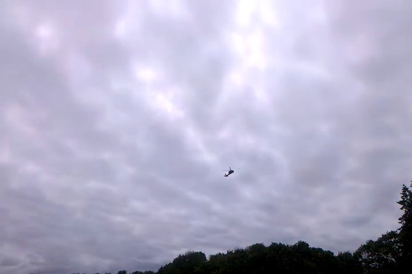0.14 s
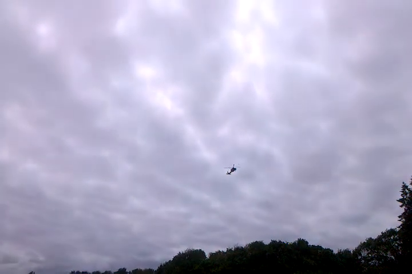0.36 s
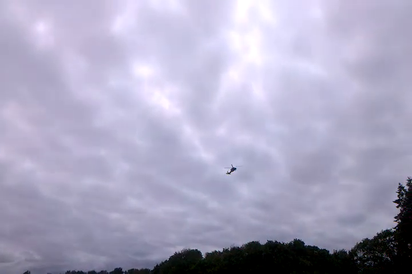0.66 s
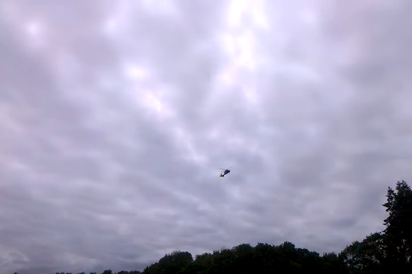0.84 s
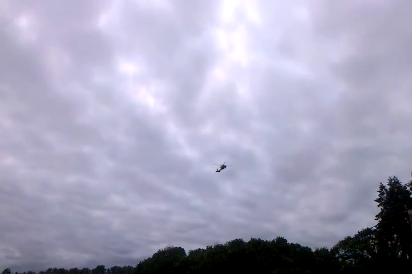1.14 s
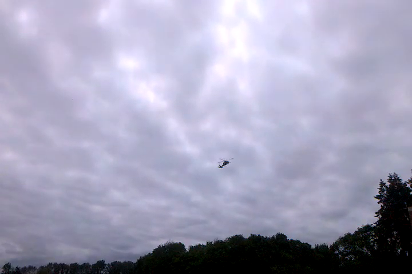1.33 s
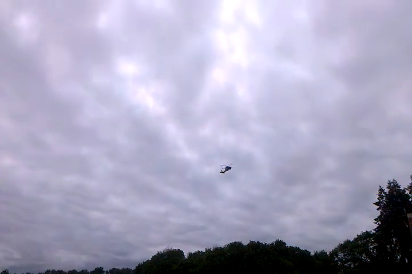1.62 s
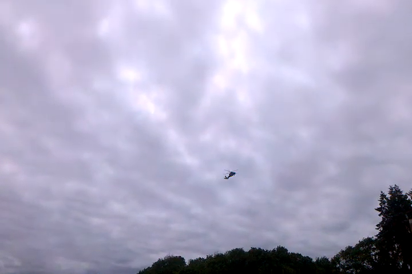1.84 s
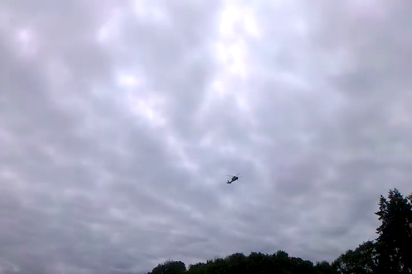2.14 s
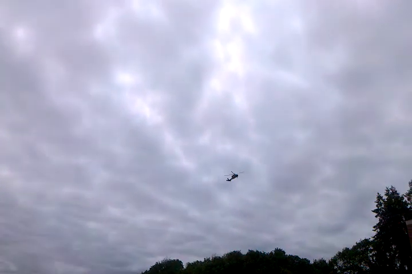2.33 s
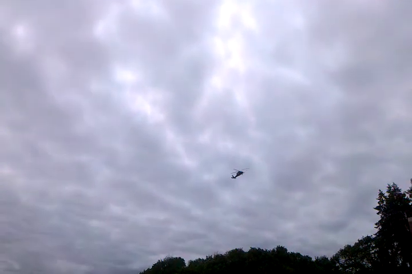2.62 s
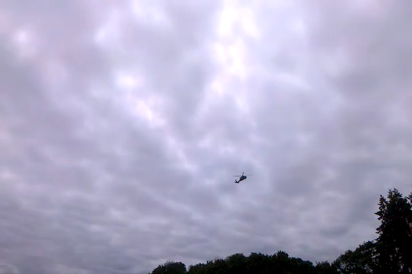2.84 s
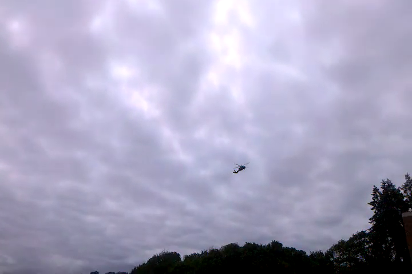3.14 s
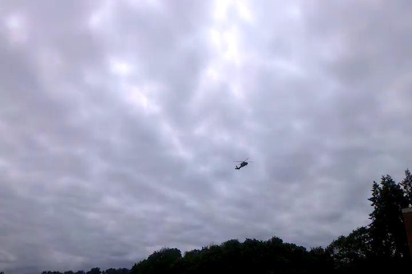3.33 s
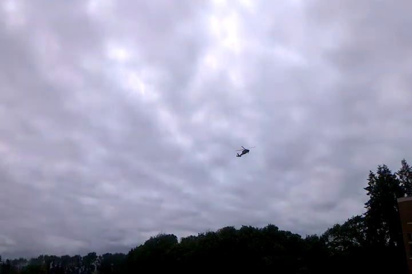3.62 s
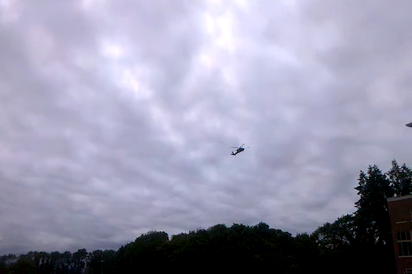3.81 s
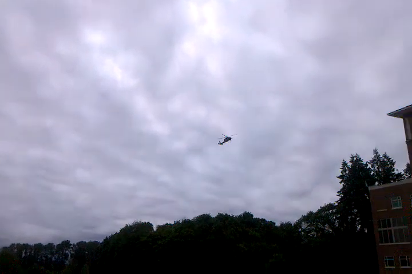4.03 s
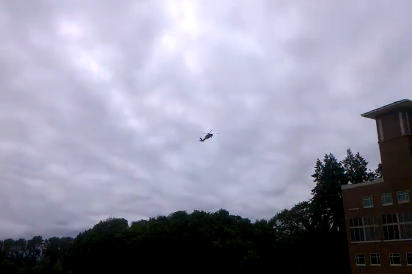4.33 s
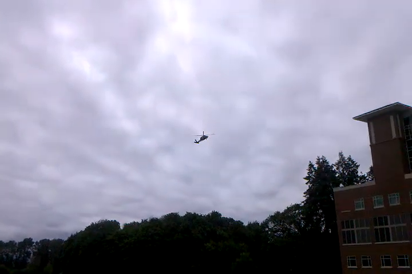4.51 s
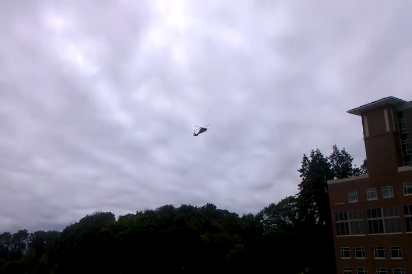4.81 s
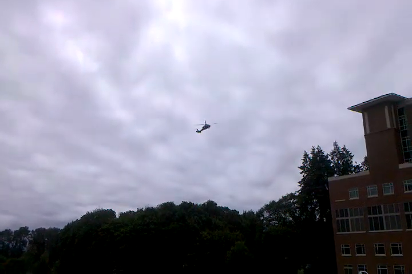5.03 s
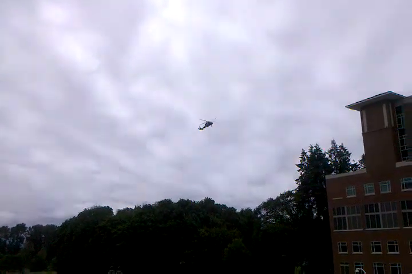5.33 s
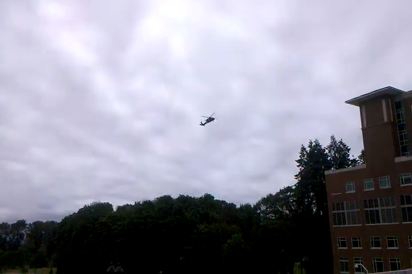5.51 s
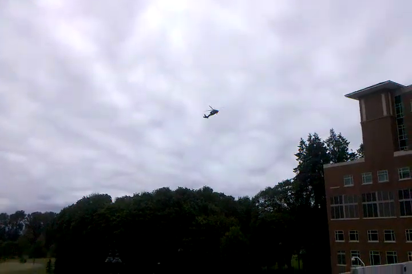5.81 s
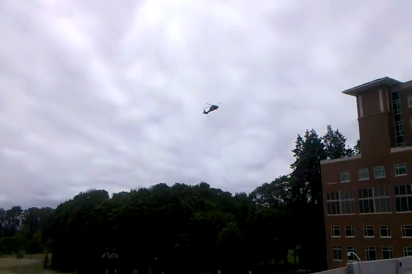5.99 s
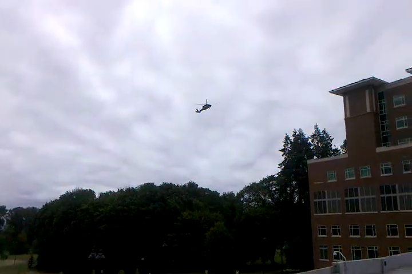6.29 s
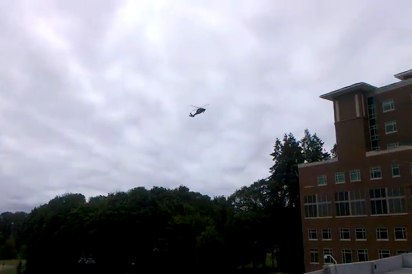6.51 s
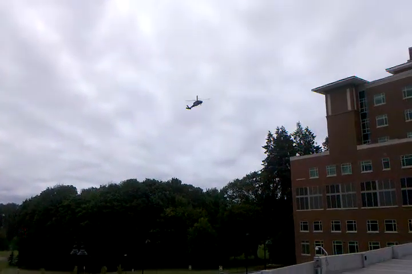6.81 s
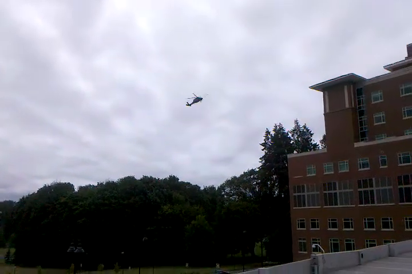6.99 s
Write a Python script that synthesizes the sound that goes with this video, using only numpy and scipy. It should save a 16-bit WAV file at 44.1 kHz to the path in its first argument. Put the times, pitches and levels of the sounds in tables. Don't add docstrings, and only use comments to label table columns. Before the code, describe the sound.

Continuous helicopter chopping outdoors, heard from a flat roof a couple of hundred metres away and closing. Deep air thuds and mid-pitched slaps flutter irregularly, some blades weak, some striking hard. The beat sharpens after three seconds, peaks with crackle and a low huff between five and six, then eases slightly while still running at the end. Rushing exhaust, steady hum, thin whine and soft wind bumps surround it, with brief building echoes and a narrow-band small microphone.

```python
import sys
import numpy as np
from scipy import signal
from scipy.fft import rfft, irfft, next_fast_len
from scipy.io import wavfile
from scipy.ndimage import uniform_filter1d, map_coordinates

SR = 44100
rng = np.random.default_rng(int(sys.argv[2]) if len(sys.argv) > 2 else 0)


def dump(signal):
    limited = np.clip(np.atleast_2d(signal).T, -1, 1)
    pcm = np.round(limited * 32767).astype(np.int16)
    wavfile.write(sys.argv[1], SR, pcm)


def elevation(decibels):
    levels = np.asarray(decibels, float)
    return 10 ** (levels / 20)


N = 315315
TIME = np.arange(N) / SR
MARGIN = SR // 10

# time in seconds,
# delay factor.
BOUNCE_PATH = [(0, 0.82), (1.8, 0.89), (2.6, 0.92), (3.3, 0.94), (6, 0.93), (7.15, 0.87)]


def unit(x):
    return x / np.sqrt(np.mean(x ** 2) + 1e-20)


def along(points, hz):
    f, v = np.transpose(points)
    return np.interp(np.log(hz + 1), np.log(f + 1), v)


def curves(rows):
    s, *cols = np.transpose(rows)
    return [np.interp(TIME, s, c) for c in cols]


def wobble(rate):
    return map_coordinates(rng.standard_normal(int(N * rate / SR) + 4), [TIME * rate])


def spells(rows, rest_db, s):
    swells = sum(elevation(db) * np.exp(-((s - at) / half) ** 2) for at, half, db in rows)
    return elevation(rest_db) + swells


def filtered(x, response):
    m = next_fast_len(N + SR // 2)
    return irfft(rfft(x, m) * response(np.fft.rfftfreq(m, 1 / SR)), m)[:N]


def resonant(x, modes):
    def response(f):
        return sum(elevation(db) * 1j * f * w / (c * c - f * f + 1j * f * w) for c, w, db in modes)
    return filtered(x, response)


def noise(spectrum, patchy_db):
    z = signal.stft(rng.standard_normal(N + 512), nperseg=512)[2]
    field = uniform_filter1d(rng.standard_normal(z.shape), size=5, axis=0)
    field = uniform_filter1d(field, size=12, axis=1)
    patched = signal.istft(z * elevation(patchy_db * unit(field)), nperseg=512)[1][:N]
    return unit(filtered(patched, lambda hz: elevation(along(spectrum, hz))))


def add(track, s, shape):
    start = round(s * SR) - len(shape) // 2 + MARGIN
    track[start:start + len(shape)] += shape


def distance():
    # time in seconds, distance in m.
    approach = [(.104, 255.9), (.978, 236.45), (1.853, 217.6), (2.733, 200.4), (3.619, 185.25),
                (4.507, 170.65), (5.392, 155.2), (6.279, 140.2), (7.01, 131.8)]
    return np.polynomial.Chebyshev.fit(*np.transpose(approach), deg=6)(TIME)


def blade_count():
    blade_hz, first_m, sound_m_s = 17.2, 250, 343
    return blade_hz * (TIME - (distance() - first_m) / sound_m_s)


def encounters():
    # time in seconds, pulse level in dB, sharp edge in dB, pulse
    # pitch in Hz, lift of slap and followers together in dB.
    vortex = [(0, -18, -43, 175, -8), (.9, -26.5, -23.5, 228, 1), (1.45, -18.5, -32, 260, -2.5),
              (2.0, -21, -32.5, 207, -3.5), (2.4, -20, -38, 198, -5), (2.75, -14, -45.5, 218, -3.5),
              (3.07, -20.5, -24, 227, -6), (3.25, -14.5, -32, 202, -1.5), (3.4, -9.5, -26, 223, -5),
              (3.9, -12, -23.5, 238, 2), (4.2, -11.5, -25, 212, -4), (4.55, -11, -25, 219, -3.5),
              (5.0, -13.5, -20, 215, 0.5), (5.25, -9, -18.5, 235, -0.5), (5.451, -9.5, -17, 234, -7.5),
              (5.92, -15.5, -25.5, 240, 2), (6.15, -20, -32, 251, -2), (7.15, -17, -24, 303, -3)]
    # time in seconds, pulse
    # and edge change in dB.
    odd_slaps = [(0.296, -19, -7), (0.405, -21, -12), (0.514, 1, -13), (0.569, -18, -8.5), (0.787, -16, -19),
                 (0.842, -9, -11), (1.005, -13, -6), (1.06, -16, -9), (1.114, -17, -6.5), (1.224, -16, -7),
                 (1.278, -26, -10.5), (1.442, -22, -2), (1.497, -10, 2), (1.661, -13, 1), (1.771, -18, -7),
                 (2.1, -2, 6), (2.155, -19, -11), (2.265, 3, -5), (2.375, 1.5, -14), (2.485, 5.5, -3),
                 (2.596, 1.5, -2), (2.651, -22, -2), (2.816, -10, 1), (2.872, 1, 16), (2.927, -20, 2.5),
                 (2.982, 13, 4), (3.038, -7, -1), (3.536, -5.5, 2.5), (3.592, 0.5, 5.5), (3.703, 0.5, 7),
                 (3.813, -1, -0.5), (3.924, -2, -5), (3.98, -17, -9), (4.035, -8, -8), (4.091, -23, -9.5),
                 (4.202, 7, 2), (4.257, -2, 1.5), (4.479, -21, -11), (4.535, 4, 1), (4.59, 5.5, 5.5),
                 (4.756, 2.5, 5.5), (4.812, 3, 5), (4.867, -7, -7.5), (4.978, 6.5, 9), (5.088, 3, -2),
                 (5.144, -9.5, 0), (5.199, 4.5, 2.5), (5.254, -2.5, -3), (5.309, 2, 0.5), (5.475, 6, 0.5),
                 (5.531, 3, 7.5), (5.586, -11, -5), (5.641, 4.5, 6), (5.697, -3, 0.5), (5.807, -11.5, -6.5),
                 (6.029, -19, -8.5), (6.474, 5.5, 5), (6.586, -10, 0), (7.039, -0.5, 2), (7.096, 4.5, 4.5),
                 (3.259, -3.5, 0.5), (3.314, -6, 3.5), (3.37, 4, 5.5), (0.241, -3, -2), (0.623, 0, -3),
               (0.732, 7, 4), (0.951, -1.5, -4), (1.169, -0.5, 1.5), (1.388, 1, 2), (3.426, 1, 3),
               (3.481, -5.5, -1), (3.647, 2, 3), (3.758, -5, -1), (3.869, -1, -5.5), (4.146, 0, 3),
               (4.313, 4, -0.5), (4.368, -1, 6), (4.424, -1, 1.5), (4.645, 1, -2.5), (4.701, -3, -1),
               (4.922, -6.5, -4), (5.033, 3.5, 1.5), (5.365, -7, -1.5), (5.42, 3, -2.5), (5.752, -1, -1.5),
               (5.863, 5, 3), (5.918, -2.5, 1), (5.973, 3, 3), (6.084, 2, 0), (6.14, -1, 0),
               (6.195, 5.5, 0), (6.251, 1, -2), (6.306, -1, 0), (6.362, -2.5, 1), (6.418, -2, -2),
               (6.53, -1, 5), (6.642, -2, 0), (6.698, 0, -6), (6.755, 2, 1), (6.811, 0, -0.5),
               (6.868, 1, 3), (6.925, -7, -4), (6.982, -5, -3)]
    # lateness in ms, pulse in dB, edge in dB.
    blades = [(.6, -.6, -.9), (-.1, .4, .6), (.1, -.8, -.4), (-1.1, 1.6, .8)]
    # time in seconds, lead in ms.
    early = [(0, 0), (4.65, 0), (4.8, .9), (5.15, .9), (5.3, .4), (6.5, .4), (7.15, 1.5)]
    jitter_ms, scatter_db, pitch_scatter, train_scatter_db = .25, .6, .04, 1.5
    faint_db, faint_wander = -14, .16
    glance_regain = 0.46
    glance_sag = 0.0098

    passed = blade_count()
    k = np.arange(int(passed[-1]) + 1)
    s = np.interp(k, passed, TIME)
    knots, *cols = np.transpose(vortex)
    db, edge_db, hz, train_db = [np.interp(s, knots, c) for c in cols]
    late_ms, blade_db, blade_edge_db = np.array(blades)[k % len(blades)].T
    odd_db = np.zeros((2, len(k)))
    for at, *change_db in odd_slaps:
        odd_db[:, np.argmin(abs(s - at))] = change_db

    chance = rng.standard_normal((len(k), 5)).T
    faint = 1 + faint_wander * np.clip(faint_db - db, 0, None)
    lead_ms = np.interp(s, *np.transpose(early))
    at = s + (late_ms - lead_ms + jitter_ms * faint * chance[0]) / 1000
    pulse_db = db + blade_db + odd_db[0] + scatter_db * faint * chance[1]
    sag = glance_sag * np.minimum(odd_db[0], 0)
    pitch = hz * np.exp(pitch_scatter * faint * chance[2] + sag)
    sharp_db = edge_db + blade_edge_db + odd_db[1] + scatter_db * faint * chance[3]
    trail_db = train_db - glance_regain * odd_db[0] + train_scatter_db * chance[4]
    return np.transpose([at, pulse_db, pitch, sharp_db, trail_db])


def slaps(passes):
    # delay in ms, level in dB.
    followers = [(-5, -15), (4.2, -6.5), (7.2, -6.5), (11.5, -14), (34, -15)]
    # centre in seconds, half length in seconds, level in dB.
    crackles = [
        (.12, 0.069, -39),
        (.8, 0.15, -40),
        (2.4, 0.37, -48.5),
        (2.935, 0.019, -30.5),
        (4.2, 0.96, -52),
        (5.38, 0.18, -25),
        (6.9, 0.47, -54),
    ]
    # centre in Hz, width in Hz, level in dB.
    tip_colour = [(1630, 98, 4), (2190, 330, -0.5), (2340, 410, -7), (3160, 600, -36)]
    # centre in Hz, width in Hz, level in dB.
    edge_colour = [(610, 120, 4.5), (713, 65, -1.5), (984, 270, -1.5), (1520, 230, -23)]
    # centre in Hz, width in Hz, level in dB.
    far_colour = [(650, 68, 12), (1100, 320, -12.5)]
    # time in seconds, change of the upper part in dB.
    bright = [(3.37, 5), (3.481, 1.5), (3.647, 4.5), (3.758, -1), (3.869, 1.5), (4.146, -1), (4.313, 8),
              (4.368, -11), (4.59, 3), (4.645, 14), (4.701, 1), (4.812, -1.5), (4.922, 1), (4.978, -5),
              (5.144, -3), (5.42, 6.5), (5.863, -9), (5.918, -12)]
    far_m, near_m = 270, 215

    body, edge, tip = np.zeros((3, N + SR // 5))
    t = np.arange(-600, 601) / SR

    def burst(late, wide):
        return rng.standard_normal(len(t)) * np.exp(-((t - late) / wide) ** 2)

    front = np.exp(-((t + .0015) / .00022) ** 2)
    for s, db, hz, edge_db, train_db in passes:
        path = np.interp(s, *np.transpose(BOUNCE_PATH))
        for ms, less_db in [(0.00016, 0.0059)] + followers:
            chance = rng.standard_normal(3) * (ms != 0)
            at = s + ms * path * (1 + .02 * chance[0]) / 1000
            gain = elevation(less_db + train_db * (ms != 0) + 1.5 * chance[1])
            u = hz * (1 + 0.09 * chance[2]) * t
            pulse = np.cos(2 * np.pi * 1.32 * u - .1) * np.exp(-(1.6 * (u - .11)) ** 2)
            add(body, at, elevation(db) * gain * pulse)
            add(edge, at, -elevation(edge_db + 11.5) * gain * front)
        add(edge, s, elevation(edge_db + 4) * burst(.0015, .0055))
        crackle = spells(crackles, -44, s) * elevation(15.5 + rng.normal(0, 1.0))
        add(tip, s, crackle * burst(0.0038, 0.0033))

    heard = slice(MARGIN, MARGIN + N)
    body, edge, tip = body[heard], edge[heard], tip[heard]
    close = np.clip((far_m - distance()) / (far_m - near_m), 0, 1)
    lift_db = sum(db * (abs(TIME - s - .005) < .025) for s, db in bright)
    sharp = resonant(close * edge, edge_colour[:2])
    sharp = sharp + resonant(close * elevation(lift_db) * edge, edge_colour[2:])
    sharp = sharp + resonant((1 - close) * edge, far_colour)
    softened = filtered(sharp, lambda f: 1 / (1 + (f / 1450) ** 4))
    near = body + softened + resonant(tip, tip_colour)
    return filtered(near, lambda f: f ** 6 / (f ** 6 + 110 ** 6) / (1 + (f / 3600) ** 4))


def walls(x):
    # frequency in Hz, decay time t60 in seconds.
    decay = [(100, 0.07), (500, 0.85), (2000, 0.23), (6000, 0.11)]
    hz, t, z = signal.stft(rng.standard_normal(SR // 2), SR, nperseg=256)
    fade = elevation(-60 * t / along(decay, hz)[:, None])
    tail = signal.istft(z * fade, SR, nperseg=256)[1]
    return signal.fftconvolve(np.pad(x, (400, 0)), tail / np.linalg.norm(tail))[:N]


def hum():
    # order of blade passing, level in dB rms.
    main_orders = [(2, -70), (3, -62.5), (4, -65.5), (5, -45), (6, -54), (7, -47), (8, -58), (9, -67.5)]
    # order, level in dB rms.
    tail_orders = [(1, -58.5), (2, -50), (3, -50)]
    # time in seconds, level in dB.
    load = [(0, -18), (1, -13), (2, -8), (3, -4.5), (4, 0), (5, 6), (6, 2), (7.15, -1.5)]
    # time in seconds, pitch in Hz, level in dB.
    whine = [(0, 3815, -80), (2.9, 3815, -76), (3.15, 3815, -60), (4, 3818, -59), (5.3, 3800, -60),
             (6.2, 3797, -61), (6.4, 3795, -57), (6.6, 3795, -62), (7.15, 3790, -67)]
    tail_ratio = 4.61
    turn = 2 * np.pi * blade_count()
    main = sum(elevation(db + 2.3 * wobble(2.3)) * np.cos(k * turn - .3 + .25 * wobble(1.2))
               for k, db in main_orders)
    tail = sum(elevation(db + 1.9 * wobble(2.3)) * np.cos(k * tail_ratio * turn + 0.8 * wobble(2.7))
               for k, db in tail_orders)
    hz, whine_db = curves(whine)
    whine_gain = elevation(whine_db + 3 * wobble(20))
    gear = whine_gain * np.cos(2 * np.pi * np.cumsum(hz + 9 * wobble(30)) / SR)
    return np.sqrt(2) * (elevation(curves(load)[0]) * (main + tail) + gear)


def roof(x, echo_db):
    late = np.arange(N) - curves(BOUNCE_PATH)[0] * .007 * SR
    return unit(x + elevation(echo_db) * np.interp(late, np.arange(N), x))


def roar():
    # time in seconds, level in dB.
    wake = [(0.0, -32), (.1, -33), (.55, -37), (.85, -33.5), (2.0, -34.5), (2.8, -34.5), (3.2, -36.5),
            (3.5, -32.5), (3.92, -31), (4.2, -31), (5.05, -30.5), (5.34, -26), (5.67, -30.5), (5.99, -25),
            (6.13, -31.5), (6.45, -31.5), (6.7, -35), (7.15, -33)]
    # time in seconds, clarity in dB, blade rush in dB.
    air = [(0, 2, 0), (.3, 0, -0.5), (.55, 1.5, 1), (1.1, 0.5, 0.5), (2.1, -1, 0.4), (2.45, 1.9, 1.5),
           (2.75, -0.1, 2.5), (3.15, 1.5, 0), (3.75, -1, 1.5), (3.95, 0.7, 2.5), (4.15, 0, -0.5),
           (4.4, 1.3, 0), (4.8, 1, 2), (5.3, 0.6, 1.5), (5.9, -0.5, 0), (6.2, 0.5, 0.5), (6.7, 0.5, 1),
           (7.15, 2.5, 0.9)]
    # frequency in Hz, level in dB per Hz.
    rumble_colour = [(30, -64.5), (65, -34.5), (100, -4), (145, -3.5), (220, 1), (320, -3.5), (400, -3.5),
                     (520, -14.5), (700, -48)]
    rush_colour = [(300, -24.5), (480, -4.5), (630, 1.5), (850, -4), (1100, -2.5), (1350, -7), (1600, -5.5),
                   (1850, -7.5), (2200, -6.5), (2600, -7.5), (2900, -14.5), (3400, -52)]
    hiss_colour = [(2400, -32), (2900, 2.5), (3300, 5), (3700, 1.5), (4050, -2), (4550, -0.5), (4800, -3.5),
                   (5300, -8), (6000, -38)]
    fizz_colour = [(4500, -30), (5200, 3.5), (5500, 6.5), (5900, 4), (6300, 4), (6900, 1), (8500, -30),
                   (9500, -25.5)]
    # frequency in Hz, level in dB per Hz.
    inlet_colour = [(4300, -41), (4480, 2), (4560, -3), (4640, -3.5), (4800, -46.5)]

    near_db = 20 * np.log10(200 / distance())
    clear_db, facing_db = curves(air)
    rumble_db = curves(wake)[0]
    rush_db = -36.5 - 0.35 * near_db + facing_db
    hiss_db = -47.5 + 0.65 * near_db + clear_db
    fizz_db = -59.5 + 0.6 * near_db + 1.7 * clear_db
    sweep = np.cos(2 * np.pi * blade_count() + 1.1)
    gust = wobble(15)
    rumble = elevation(rumble_db + 2.2 * sweep + 0.22 * gust)
    rumble = rumble * roof(noise(rumble_colour, patchy_db=0.35), echo_db=-12.5)
    rush = elevation(rush_db + 1.1 * sweep + .5 * gust + 0.37 * wobble(40))
    rush = rush * noise(rush_colour, patchy_db=0.5)
    hiss = elevation(hiss_db + 0.5 + 0.36 * sweep + 0.27 * gust + 0.16 * wobble(40))
    hiss = hiss * noise(hiss_colour, patchy_db=0.5)
    fizz = elevation(fizz_db - 1.5 + 0.44 * sweep + 0.85 * wobble(8.9))
    fizz = fizz * noise(fizz_colour, patchy_db=0.65)
    inlet = elevation(-66 + clear_db + 1.5 * wobble(2.9)) * noise(inlet_colour, patchy_db=-2.0)
    return rumble + rush + hiss + fizz + inlet


def breeze():
    # centre in seconds, half length in seconds, level in dB.
    puffs = [
        (0, 0.26, -48),
        (2.25, 0.3, -64),
        (3.72, 0.095, -45),
        (4.63, 0.056, -52),
        (5.42, 0.11, -44),
        (5.97, 0.074, -44),
        (6.3, 0.29, -51.5),
    ]
    # frequency in Hz, level in dB per Hz.
    buffet_colour = [(15, -27), (30, -12), (48, -4), (70, 1), (110, 1), (200, -49.5)]
    return spells(puffs, -52.5, TIME) * noise(buffet_colour, patchy_db=-3.0)


def thuds(times):
    # time in seconds, peak in dB, pitch in Hz.
    push = [(0, -24, 185), (.3, -21.5, 185), (.6, -28.5, 153), (1.19, -26, 147), (1.79, -25.5, 165),
            (2.38, -25, 167), (2.98, -25, 160.6), (3.58, -26.5, 163), (4.17, -23, 165), (4.77, -19.5, 166),
            (5.36, -18.5, 169), (5.96, -21.5, 149), (6.3, -23, 128), (6.6, -24.5, 134), (7.15, -22, 142)]
    # time in seconds, change in dB.
    uneven = [(0.077, 4), (0.132, -18), (0.186, 2.5), (0.241, 1), (0.296, -6), (0.46, -12), (0.569, -2),
              (0.623, 9), (0.732, -3), (0.787, -15), (0.842, 8), (1.005, -14), (1.06, 6), (1.224, -20),
              (1.442, -10), (1.661, -14), (1.716, 3.5), (1.771, -7), (1.826, 3), (1.88, -12), (2.1, -17),
              (2.155, 2), (2.32, -15), (2.43, -5), (2.54, -26), (2.596, 8), (2.651, 6.5), (2.761, -2),
              (2.872, 5), (2.982, -8), (3.148, -5), (3.204, -22), (3.259, 2), (3.314, -14.5), (3.481, 5.5),
              (3.592, -13), (3.758, 3), (3.869, -13), (4.091, -9), (4.313, -6), (4.59, -1.5), (4.701, 3),
              (5.199, -9), (5.309, -1), (5.531, 3), (5.697, -9), (5.752, 5.5), (5.807, -20), (5.863, -14),
              (5.918, 2), (5.973, 8), (6.084, 1.5), (6.251, -4), (6.362, 1), (6.698, -18), (6.755, -15)]
    # time in seconds, peak in dB, pitch in Hz.
    ticks = [
        (.099, -21, 1660),
        (7.1465, -18, 286),
    ]
    cycles, late_ms, scatter_db = 1.15, 3.4, 0.66

    track = np.zeros(N + SR // 5)
    t = np.arange(-900, 901) / SR
    knots, *cols = np.transpose(push)
    db, pitch = [np.interp(times, knots, c) for c in cols]
    for at, change_db in uneven:
        db[np.argmin(abs(times - at))] += change_db
    for s, peak_db, hz, chance in zip(times, db, pitch, rng.standard_normal((len(times), 2))):
        u = hz * (1 + 0.016 * chance[0]) * t
        swing = np.cos(2 * np.pi * u) * np.exp(-(u / cycles) ** 2)
        add(track, s + late_ms / 1000, -elevation(peak_db + scatter_db * chance[1]) * swing)
    for s, peak_db, hz in ticks:
        snap = np.cos(2 * np.pi * hz * t) * np.exp(-(hz * t / 1.7) ** 2)
        add(track, s, elevation(peak_db) * snap)
    return track[MARGIN:MARGIN + N]


def nozzle():
    # pitch in Hz, centre in seconds, half length in seconds, level in dB.
    streaks = [
        (3200, 6.9, 0.32, -62),
        (2600, 6.7, .4, -51.5),
        (3850, 7.0, .15, -67.5),
        (3800, 3.7, 0.98, -57.5),
        (1520, 1.9, 0.09, -47),
        (1100, 4.65, .12, -46.5),
        (300, 5.96, .06, -33),
        (380, 4.9, 0.11, -46),
    ]
    flow = rng.standard_normal(N)
    flutter = elevation(3 * wobble(14))

    def band(hz, width_hz=90):
        return unit(filtered(flow, lambda f: np.exp(-((f - hz) / width_hz) ** 2)))

    return flutter * sum(spells([flare], -91.5, TIME) * band(hz) for hz, *flare in streaks)


def scene():
    passes = encounters()
    beat = slaps(passes)
    answer = elevation(-17.5) * walls(beat)
    mix = beat + answer + hum() + roar() + breeze() + thuds(passes[:, 0]) + nozzle()
    return mix[None]


def low_pass(x):
    return signal.sosfilt(signal.butter(12, 9040, fs=SR, output="sos"), x)


def record(dry):
    def mic(hz):
        bass_cut = (1j * hz / (70 + 1j * hz)) ** 2
        treble_cut = 1 / (1 + (hz / 7150) ** 36) + elevation(-34) * (hz < 9100)
        return bass_cut * treble_cut
    return low_pass(filtered(dry[0], mic)[None])


dry = scene()
out = record(dry)
dump(out)
```